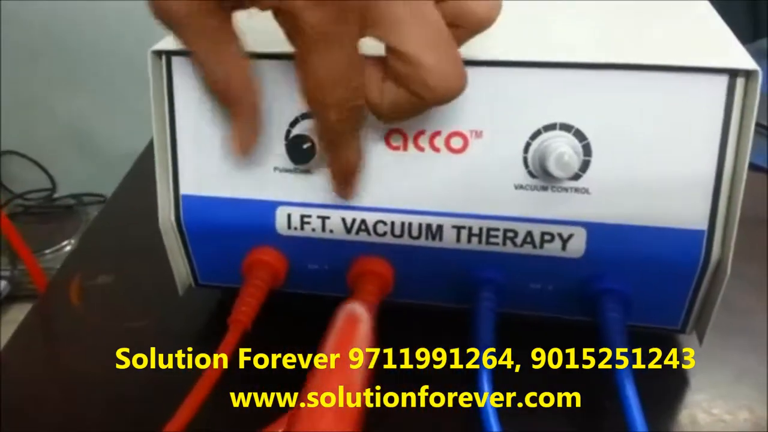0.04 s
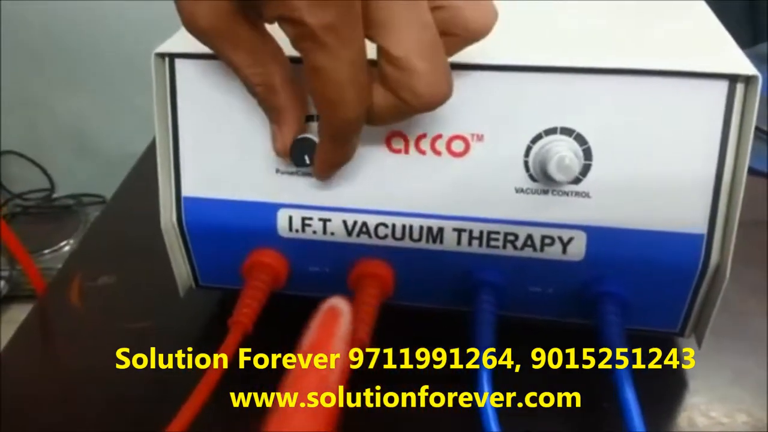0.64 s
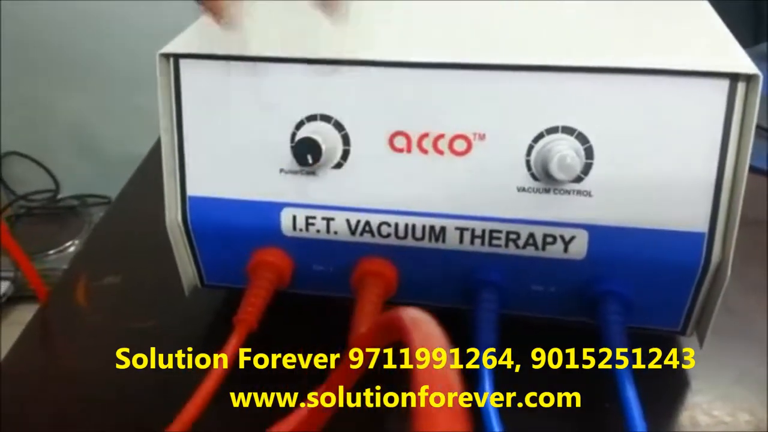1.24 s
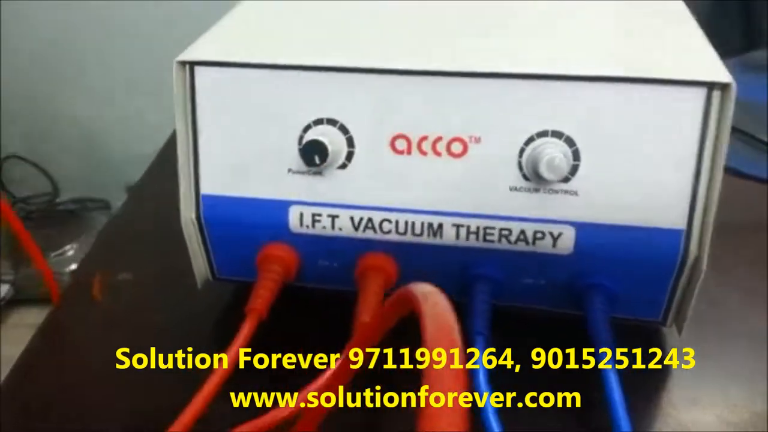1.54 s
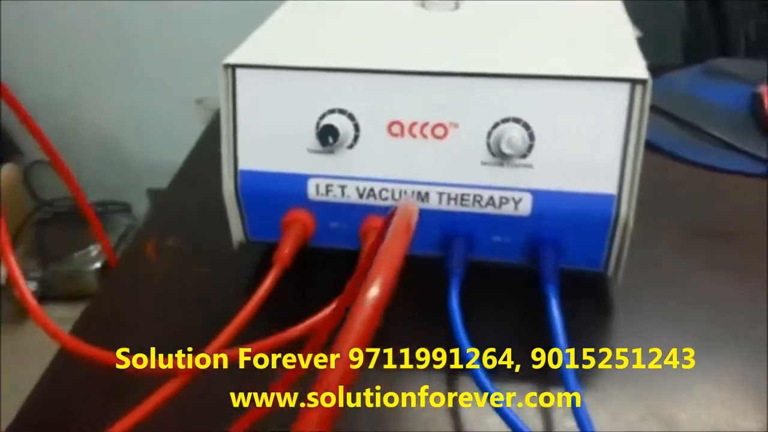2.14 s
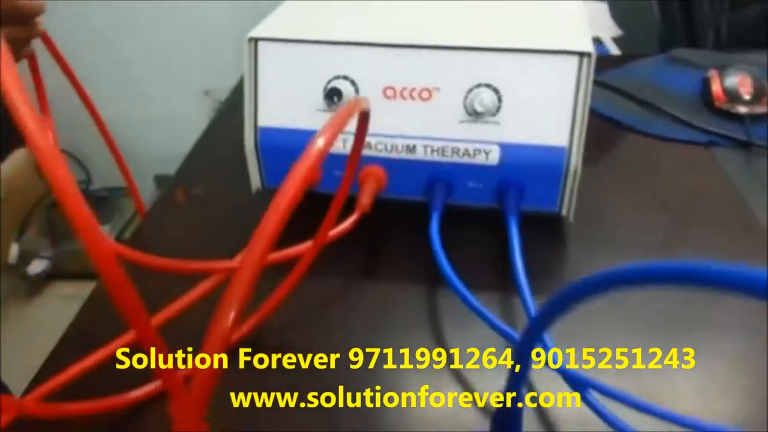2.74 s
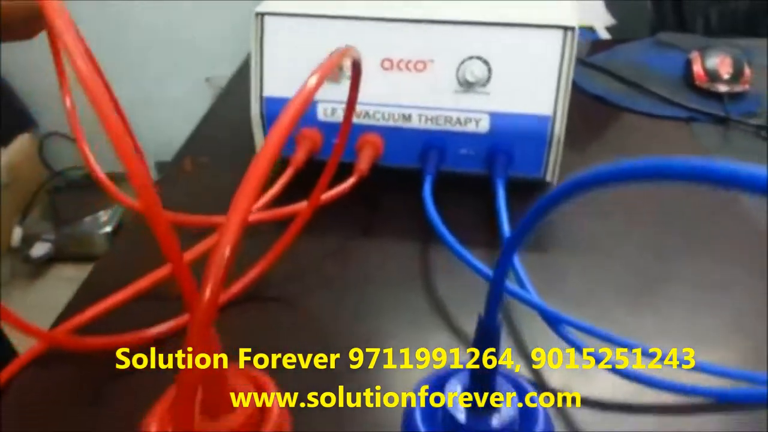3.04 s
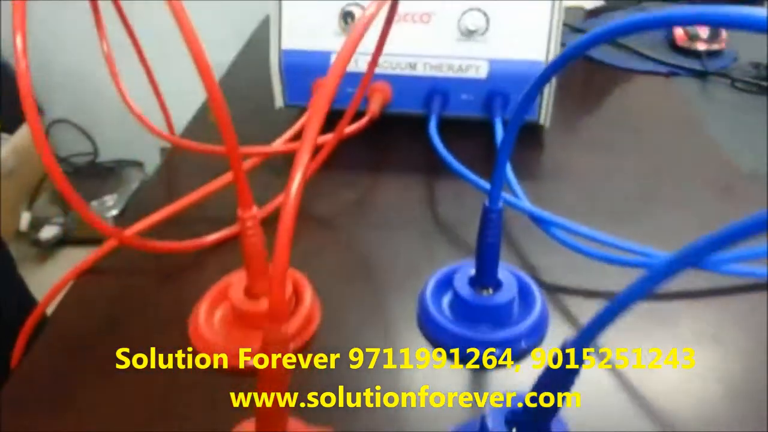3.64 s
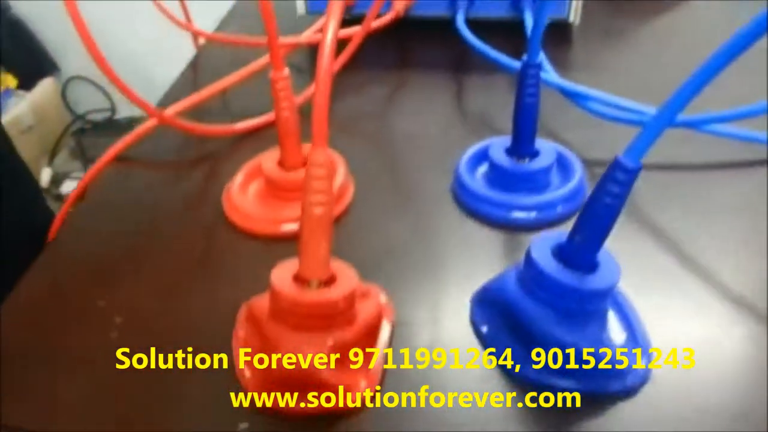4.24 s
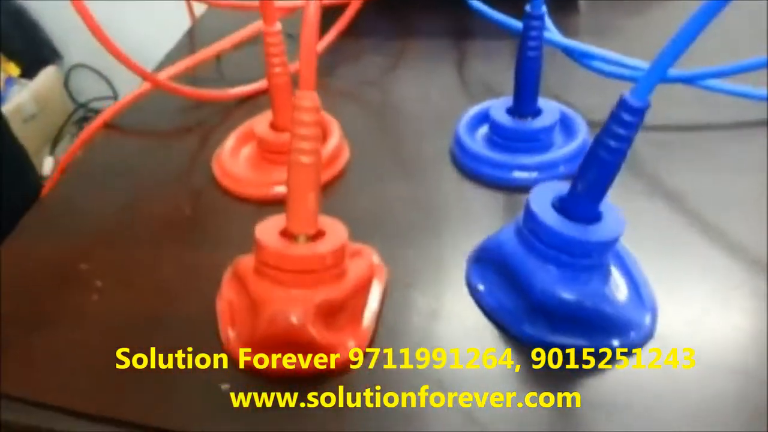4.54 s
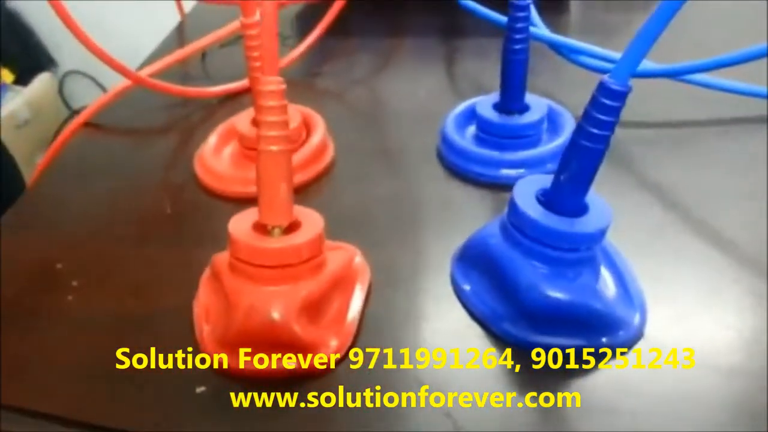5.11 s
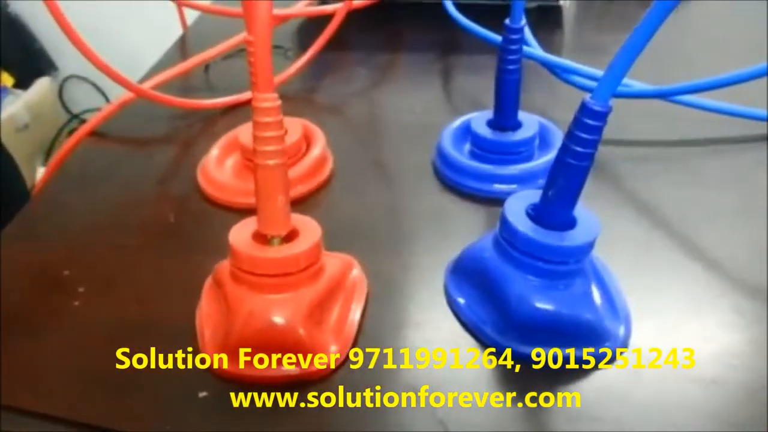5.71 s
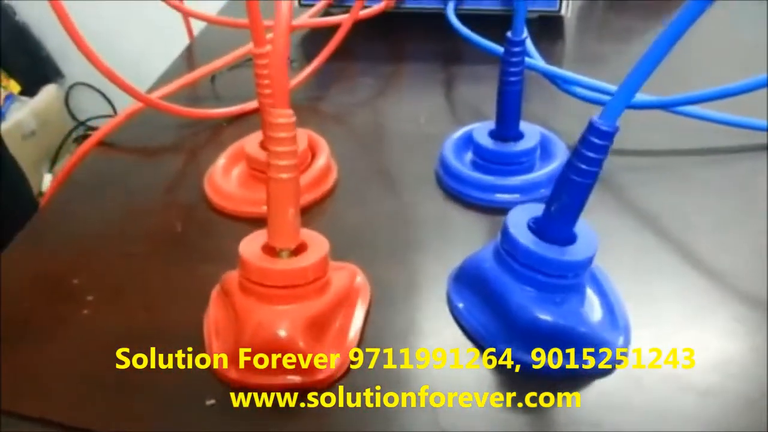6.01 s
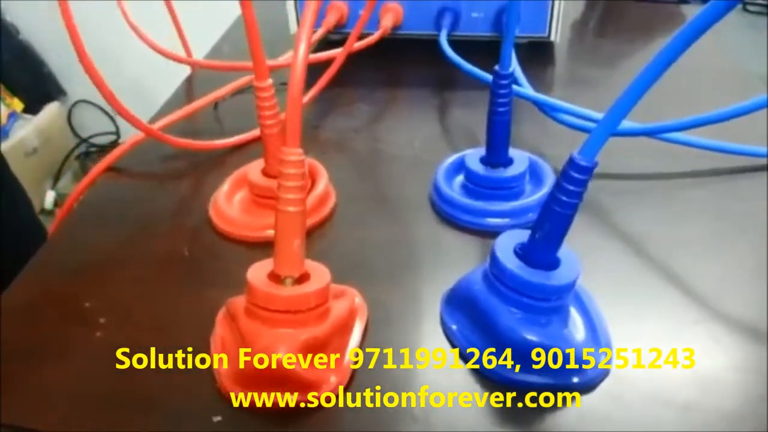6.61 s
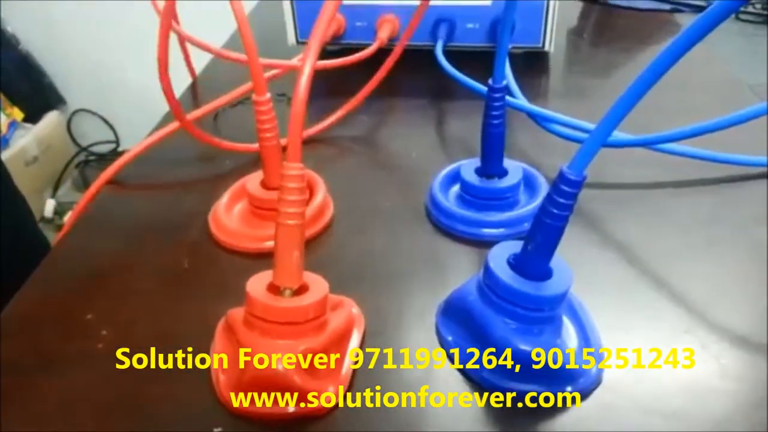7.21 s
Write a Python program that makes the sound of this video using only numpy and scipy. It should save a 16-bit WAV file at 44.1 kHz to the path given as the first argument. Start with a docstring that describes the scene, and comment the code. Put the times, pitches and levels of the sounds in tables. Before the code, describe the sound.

A small vacuum pump in a sheet-metal case runs three times on a table in a quiet room, heard in stereo. After light knob handling and a puff of air, each run begins with a clack and a rising whine, settling into a rattling, hissing hum. The first run squeals briefly. Twice the pump clacks off and winds down with faint seeping air. The microphone starts close and moves a little farther away.

```python
"""A small mains vacuum pump in a sheet-metal case, on a table in a quiet room, in stereo from close by.
A hand turns a knob, air parps at the valve, and relay and valve clack. The induction motor whines up to
speed, hums and rattles while air hisses, and squeals briefly. The microphone begins to draw back as the
pump clacks off and coasts, and the hoses leak. During a second run the microphone reaches its far spot;
from there we hear the pump stop again and start a third run, still going at the end."""
import sys
import numpy as np
from scipy import signal
from scipy.fft import rfft, irfft
from scipy.io import wavfile
from scipy.ndimage import uniform_filter1d

SR = 44100
rng = np.random.default_rng(int(sys.argv[2]) if len(sys.argv) > 2 else 0)


def generate_wav(sig):
    """Save sig (samples, or channels by samples) to the path in sys.argv[1] as 16-bit PCM at SR."""
    pcm = np.round(np.clip(np.atleast_2d(sig).T, -1, 1) * 32767).astype(np.int16)
    wavfile.write(sys.argv[1], SR, pcm)


N = 320198
T = np.arange(N) / SR
FREQ = np.maximum(np.arange(N // 2 + 1) * SR / N, 1)
SHAFT_HZ, MAINS_HZ, SPIN_UP_S, COAST_S = 45.17, 50, .335, .62

# The microphone's path. Each row: time in seconds, distance from 0 (near) to 1 (far).
MIC_DISTANCE = [(0, 0.0026), (1.9, 0), (2.6, 0.65), (3.4, 0.39), (3.9, 0.99), (7.26, 1)]
# Room tone. Each row: frequency in Hz, relative level in dB.
ROOM_TONE = [(15, -52.5), (25, -40), (40, -10), (146, -7), (231, -3.5), (415, -14.5), (1150, -19.5),
             (1540, -32), (2300, -27.5), (2700, -32), (3440, -36.5), (12400, -37.5), (15000, -45)]
# Handling rustle. Each row: middle in seconds, half length in seconds, level in dB.
RUSTLES = [(0.106, 0.089, -57.5), (0.368, 0.057, -49.5), (2.854, 0.067, -57), (5.472, 0.054, -61)]
# Knob and hose taps. Each row: start in seconds, level in dB, centre in Hz.
TAPS = [(0.045, -46.5, 900), (0.141, -44, 300), (0.150, -40.5, 1220), (2.479, -46, 250),
        (5.262, -50.5, 330), (6.824, -33, 2960)]
# Switching on. Each row: start in seconds, then snap, tail, ring, treble lift, gain of the run and
# panel tone, all in dB.
SWITCH_ON = [(0.4052, -16, -29.5, -29.5, 2, 0, -48), (3.0052, -20, -29.5, -33, -8.5, -1.25, -45),
             (5.6337, -28.5, -30.5, -35.5, -16, -1.5, -36.5)]
# Colour of the switch-on clack. Each row: frequency in Hz, relative level in dB.
ON_COLOUR = [(120, -22), (230, -12.5), (330, -4.5), (700, -7), (1020, -10.5), (1900, -9.5), (2500, -18),
             (3200, -8), (4050, -27.5), (5300, -6.5), (7700, -1.5), (8900, -1.5), (9500, -15.5),
             (10800, -9), (11700, -31.5), (13000, -23.5), (14500, -28)]
# The valve and its bracket. Each row: mode in Hz, relative level in dB, t60 in seconds.
VALVE_MODES = [(303, -2, 0.62), (328, -7, 0.34), (496, -6.5, 0.28), (644, -3, 0.32), (814, -3.5, 0.4),
               (963, 2, 0.095), (1300, -13.5, 0.23), (1716, -9.5, .14), (2102, -13, 0.29),
               (2950, -15.5, 0.26), (3340, -14, .2), (5300, -7.5, 0.21), (6600, -10.5, 0.099),
               (7960, -9, 0.099), (9500, -8.5, 0.11), (9080, 2.5, 0.084), (10850, -2.5, 0.086)]
# The pump jolts its mounts, starting and stopping. Each row: start in seconds, strength in dB.
JOLTS = [(0.407, -22), (0.443, -28), (0.547, -26), (0.567, -31), (0.608, -23.5), (0.657, -19.5),
         (0.727, -16), (0.786, -21), (0.831, -16.5), (3.378, -28.5), (3.54, -18), (2.385, -47),
         (2.452, -50), (2.53, -51), (4.944, -33), (5.09, -50), (5.172, -57)]
# The jolted case. Each row: mode in Hz, relative level in dB, t60 in seconds.
JOLT_MODES = [(103, -16, 0.14), (225, -14, .06), (349, 1.5, 0.087), (481, -5, 0.082), (811, -6.5, 0.043)]
# Case modes swept by the rotor slot whine. Each row: shaft multiple and mains multiple of the whine,
# mode in Hz, width in Hz, relative level in dB.
WHINE_MODES = [(17, 0, 490, 110, -35), (17, 0, 747, 190, -32), (17, 2, 850, 140, -38),
               (28, 0, 1050, 170, -37), (30, 0, 1250, 220, -39), (33, 0, 1450, 160, -47)]
# Case tones shaken by the starting current. Each row: centre in Hz, width in Hz, relative level in dB.
INRUSH_TONES = [(102, 15, -38.5), (289, 25, -44), (460, 64, -49), (790, 110, -42)]
# Harmonics of the pump stroke. Each row: shaft multiple, relative level near and far in dB.
STROKE_HARMONICS = [(1, -53, -53.5), (2, -39.5, -42), (3, -37, -39), (4, -40, -39), (5, -28.5, -37),
                    (6, -33, -37), (7, -37.5, -35.5), (8, -24, -42), (9, -30.5, -40.5), (10, -33.5, -39),
                    (11, -32.5, -37), (12, -44, -55), (13, -58, -52), (14, -39, -45.5), (15, -52, -45),
                    (16, -58, -42), (17, -40.5, -33.5), (18, -56, -54), (19, -46, -64.5), (21, -51, -57),
                    (22, -54, -62), (23, -53, -59.5), (25, -48, -53.5), (26, -57.5, -67),
                    (27, -55.5, -49.5), (28, -74.5, -54), (29, -60.5, -52.5), (30, -62, -49),
                    (32, -48.5, -52), (33, -51.5, -62)]
# Magnetic hum and its beats. Each row: shaft multiple, mains multiple, relative level near and far in dB.
MAGNETIC_HUM = [(0, 2, -39, -46), (0, 6, -55, -45.5), (2, 2, -49.5, -49), (3, 2, -49.5, -49),
                (5, 2, -44.5, -44), (6, 2, -37.5, -47.5), (7, 2, -41.5, -55), (8, 2, -39.5, -47.5),
                (9, 2, -47.5, -55), (9, -2, -42.5, -55), (11, -2, -44.5, -55), (12, -2, -47.5, -56),
                (12, 2, -51.5, -56), (16, 2, -50.5, -42), (17, -2, -51.5, -49.5), (17, 2, -38, -46.5),
                (17, 4, -47.5, -53), (17, 12, -58, -52.5)]
# Unsteady bearing tones. Each row: shaft multiple, relative level near and far in dB.
BEARING_TONES = [(2.46, -40, -49), (2.55, -43.5, -48), (3.45, -37.5, -40), (3.55, -32.5, -38),
                 (5.55, -54, -46), (5.66, -56, -44.5), (10.5, -39, -49), (10.75, -48, -45),
                 (18.77, -50, -48)]
# Case rattle. Each row: frequency in Hz, relative density near and far in dB.
CASE_RATTLE = [(25, -90.5, -86), (55, -78, -71), (90.5, -64, -73), (230, -64.5, -62.5), (355, -56.5, -65),
               (570, -70.5, -68), (850, -66, -67), (1310, -66, -65), (1880, -73.5, -78),
               (3060, -90.5, -89.5), (6000, -110, -112)]
# Case resonances that colour the rattle. Each row: centre in Hz, width in Hz, lift in dB.
CASE_RESONANCES = [(105.6, 64, 6.5), (157, 150, 10), (490, 87, 11), (788, 150, 10)]
# Air through the pump valves. Each row: frequency in Hz, relative density near and far in dB.
VALVE_HISS = [(900, -100, -100), (2050, -79, -83.5), (2700, -79.5, -83.5), (3140, -76, -75),
              (3630, -78.5, -79.5), (4100, -83, -86), (5640, -78.5, -81.5), (8300, -79.5, -84.5),
              (8700, -78, -79.5), (10230, -81.5, -86), (10400, -73.5, -79), (11930, -89, -95.5),
              (13800, -84, -89.5), (14400, -91, -98.5)]
# Growls of the case. Each row: middle in seconds, half length in seconds, pitch in Hz, level in dB.
GROWLS = [(.755, 0.018, 765, -28), (3.317, 0.029, 765, -29), (3.385, .025, 765, -36),
          (5.96, .014, 750, -27), (5.979, .011, 765, -21.5), (6.04, .014, 790, -27.5),
          (5.893, 0.036, 255, -43), (6.023, 0.065, 255, -27)]
# Spurts of the squeal. Each row: start and length in seconds, fundamental and octave in dB.
SQUEAL_SPURTS = [(1.55, .03, -38, -52), (1.578, .042, -35.5, -42.5), (1.63, .052, -34, -46.5),
                 (1.686, .055, -42, -42), (1.743, .062, -52, -41)]
# Switching off. Each row: start in seconds, then snap, tail, ring and treble lift in dB,
# seconds until the load vents, groan in dB.
SWITCH_OFF = [(2.1386, -12.5, -27, -30, -1.5, 0.016, -32), (4.767, -23.5, -28.5, -36.5, -11, 0.051, -31)]
# Colour of the switch-off clack. Each row: frequency in Hz, relative level in dB.
OFF_COLOUR = [(200, -18.5), (500, -2), (1000, -7), (1400, 1), (1900, 6.5), (2600, 4.5), (3300, -1),
              (4300, -4), (5400, 3.5), (7400, 9.5), (9000, -4), (12000, -7.5), (14500, -4)]
# The stop that the released armature falls against. Each row: mode in Hz, level in dB, t60 in seconds.
BACK_STOP_MODES = [(1250, -20, .03), (1390, -18.5, .035), (1685, -27, .06), (1841, -27, .06),
                   (2094, -28, .05), (2380, -27, .03)]
# Resonances that groan on slowing. Each row: centre in Hz, width in Hz, relative level in dB.
GROAN_MODES = [(105, 74, -7), (250, 120, -3.5), (496, 69, -14.5), (760, 62, -5)]
# Hum notes that ring on in case and room. Each row: pitch in Hz, relative level near and far in dB.
LINGERING_NOTES = [(102, -30, -45.5), (161.5, -34, -35.5), (361, -27.5, -43), (482, -28, -40.5),
                   (765, -46, -35)]
# Stereo width at the microphone. Each row: frequency in Hz, side gain in dB.
STEREO_WIDTH = [(60, -7), (110, -32), (200, -13.5), (380, -17.5), (700, -8), (1290, -4.5), (2380, -0.5),
                (4400, 0), (15000, 0)]
# Stereo balance. Each row: frequency in Hz, left minus right in dB.
STEREO_LEAN = [(60, 0.5), (200, 1), (400, 0.5), (750, 1.5), (1290, -4.5), (2380, 7), (4400, 0.5),
               (8000, -1), (15000, 1)]


def undb(db):
    """Decibels to gain."""
    return 10 ** (np.asarray(db) / 20)


def spectrum(rows, column=1):
    """One column of a table, joined by straight lines in log frequency."""
    rows = np.array(rows, float)
    return np.interp(np.log(FREQ), np.log(rows[:, 0]), rows[:, column])


def noise(db):
    """Unrelated mid and side noise with this level per Hz."""
    return irfft(rfft(rng.standard_normal((2, N))) * undb(db), N) * np.sqrt(SR / 2)


def unit(x):
    """Scale to rms 1."""
    return x / np.sqrt(np.mean(x ** 2))


def band(hz, width_hz):
    """Noise in one resonance, rms 1."""
    detune = (FREQ - hz ** 2 / FREQ) / width_hz
    return unit(noise(-20 * np.log10(1 + detune ** 2)))


def resonance(hz, centre_hz, width_hz):
    """A resonance curve, 1 at its centre."""
    return 1 / (1 + (2 * (hz - centre_hz) / width_hz) ** 2)


def walk(rate_hz):
    """A random wander in time, spread near 1."""
    knots = np.arange(0, T[-1] + 1, 1 / rate_hz)
    return np.interp(T, knots, rng.standard_normal(len(knots)))


def ripple(spacing_hz):
    """Peaks and dips that reflections leave in a spectrum, spread near 1."""
    knots = np.arange(0, SR, spacing_hz)
    return np.interp(FREQ, knots, rng.standard_normal(len(knots)))


def tone(turns, spread=3.1):
    """A sine of rms 1 that reaches mid and side in unrelated phases."""
    phase = np.array([[spread * rng.standard_normal()], [2 * np.pi * rng.random()]])
    return np.sqrt(2) * np.cos((2 * np.pi * (turns % 1) + phase).astype(np.float32))


def swell(time, peak_s, half_s):
    """A bell-shaped rise and fall."""
    return np.exp(-((time - peak_s) / half_s) ** 2)


def envelope(start_s, attack_s, hold_s, release_s):
    """Attack, hold and release with rounded corners."""
    corners = start_s + np.cumsum([0, attack_s, hold_s, release_s])
    return np.sin(np.pi / 2 * np.interp(T, corners, [0, 1, 1, 0])) ** 2


def latest(rows):
    """For every moment, the columns of the most recent event of a table."""
    rows = np.array(rows, float)
    return rows[np.maximum(np.searchsorted(rows[:, 0], T) - 1, 0)].T


def room(floor_db=-59, flicker_db=1.6):
    """Low room tone that swells with handling."""
    rustle = sum(undb(db) * swell(T, s, half_s) for s, half_s, db in RUSTLES)
    return unit(noise(spectrum(ROOM_TONE))) * np.hypot(undb(floor_db), rustle) * undb(flicker_db * walk(9.7))


def taps(t60=.023, tail_db=-20, tail_t60=.3):
    """Small knocks on knob and hose, each with a short room tail."""
    out = np.zeros((2, N))
    for s, db, hz in TAPS:
        age = np.clip(T - s, 0, 1)
        decay = undb(-60 * age / t60) + undb(tail_db - 60 * age / tail_t60)
        out += undb(db) * np.minimum(age / .0022, 1) * decay * band(hz, .84 * hz)
    return out


def parp(start_s=.281, hz=438, sag_hz_per_s=200, tone_db=-41, hiss_db=-53):
    """Air parps and hisses at the valve just before the first run, reedy and sagging in pitch."""
    pitch = hz - sag_hz_per_s * np.clip(T - start_s, 0, 1)
    turns = np.cumsum(pitch * (1 + .003 * walk(60))) / SR
    flutter = undb(2.5 * walk(40.8))
    reed = tone(turns) + undb(-27) * tone(2 * turns) + undb(-22) * tone(3 * turns)
    hiss = undb(hiss_db) * envelope(start_s, .068, .086, .06) * band(1300, 1500)
    return undb(tone_db) * envelope(start_s, .044, .029, .041) * flutter * reed + hiss


def clacks(rows, colour, chatter_s, snap_t60, tail_t60, size=30000):
    """The armature chatters briefly and rings the valve; case and room carry the tail."""
    out, t = np.zeros((2, N)), np.arange(size) / SR
    attack = 1 - np.exp(-t / .0012)
    for s, snap_db, tail_db, ring_db, treble_db, *_ in rows:
        start = int(s * SR)
        colour_db = spectrum(colour) + 3.2 * ripple(90) + treble_db * FREQ / (FREQ + 3000)
        grain = unit(noise(colour_db))[:, :size]
        snap = undb(snap_db - 60 * np.maximum(t - chatter_s, 0) / snap_t60)
        tail = undb(tail_db - 60 * t / tail_t60)
        ring = sum(undb(db - 60 * t / t60) * np.sin(2 * np.pi * (hz * t + rng.random((2, 1))))
                   for hz, db, t60 in VALVE_MODES)
        out[:, start:start + size] += attack * (grain * np.hypot(snap, tail) + undb(ring_db) * ring)
    return out


def strikes(blows, modes, size=12000):
    """Each blow (seconds, dB) rings the same modes; the deepest bass below about 70 Hz is cut away."""
    out, t = np.zeros((2, N)), np.arange(size) / SR
    attack = 1 - np.exp(-t / .0006)
    for s, blow_db in blows:
        start = int(s * SR)
        for hz, db, t60 in modes:
            phase = np.array([[0], [rng.random()]])
            ring = undb(db - 60 * t / t60) * np.sin(2 * np.pi * (hz * t + phase))
            out[:, start:start + size] += undb(blow_db) * attack * ring
    return signal.sosfilt(signal.butter(2, 70, "high", fs=SR, output="sos"), out)


def motor(age, coasting, brake_power=1.5):
    """Share of full speed, and mains on or off: steady torque spins the rotor up, the load brakes it."""
    speed = np.clip(age / SPIN_UP_S, 0, 1) * (1 - np.clip(coasting / COAST_S, 0, 1) ** brake_power)
    powered = 1. * ((age > 0) & (coasting == 0))
    return uniform_filter1d(speed, size=1500).clip(0, 1), uniform_filter1d(powered, size=1500)


def spin_up(turns, speed, powered, age, whine_db=-3.5, buzz_db=-38, settle_s=.053, fade_db_per_s=154):
    """The rising slot whine flares in each mode it crosses while heavy current shakes the case."""
    ragged = .08 * walk(120)
    whine = 0
    for k, m, hz, width, db in WHINE_MODES:
        pitch = k * SHAFT_HZ * speed + m * MAINS_HZ
        whine += undb(db) * resonance(pitch, hz, width) * tone(k * turns + m * MAINS_HZ * T + ragged)
    whine *= undb(whine_db - fade_db_per_s * np.maximum(age - SPIN_UP_S - settle_s, 0))
    # the panels buzz at each peak of the mains current
    peaks = np.cos(2 * np.pi * MAINS_HZ * T) ** 4
    buzz = undb(buzz_db) * swell(age, SPIN_UP_S, .058) * peaks * (band(300, 270) + band(670, 320))
    # the piston load chops the whine once a turn
    chop = 1 + .3 * np.cos(2 * np.pi * turns) + .15 * walk(150)
    shake = sum(undb(db) * band(hz, width) for hz, width, db in INRUSH_TONES)
    current = np.minimum(2 * speed, 1) ** 2 * (1 - speed ** 3)
    return powered * (chop * whine + buzz + current * shake)


def panel(age, panel_db, hz=328):
    """A panel of the case sings briefly while the rotor is still slow."""
    return undb(panel_db) * swell(age, peak_s=.16, half_s=.077) * tone(hz * T + .05 * walk(30))


def gush(age, far, db=-50, far_db=-5):
    """Air rushes through the opened valve until the pump takes over."""
    return undb(db + far_db * far) * swell(age, peak_s=.2, half_s=.12) * band(5500, 9000)


def hum(turns, speed, powered, far, return_turns=.365, return_share=.9, waver_db=.6, bearing_db=1):
    """Harmonics of the piston's two knocks a turn, with mains beats and bearing tones between them."""
    orders, near_levels, far_levels = np.transpose(STROKE_HARMONICS)
    out = np.zeros((2, N))
    # the room scatters every harmonic's phase alike: about 0.1 radian close up, 0.4 from afar
    scatter = .1129 + .2936 * far
    for k, near, away in STROKE_HARMONICS:
        # off full speed, each harmonic slides through the response of the case
        passing_db = np.interp(k * speed, orders, near_levels + far_levels) / 2 - (near + away) / 2
        pair_phase = np.angle(1 + return_share * np.exp(-2j * np.pi * k * return_turns)) + np.pi / 2
        offset = (pair_phase + scatter * rng.standard_normal()) / (2 * np.pi)
        level_db = near + far * (away - near) + .6 * passing_db + waver_db * walk(9)
        out += undb(level_db) * tone(k * turns + offset, spread=0)
    for k, m, near, away in MAGNETIC_HUM:
        out += powered * undb(near + far * (away - near)) * tone(k * turns + m * MAINS_HZ * T)
    for k, near, away in BEARING_TONES:
        slip = .09 * walk(5.5)
        out += undb(near + far * (away - near) + bearing_db) * tone(k * turns + slip)
    return out


def distant_noise(rows, lift_db, far):
    """Noise that fades from its near colour to its far one as the microphone draws back."""
    near, away = (noise(spectrum(rows, column) + lift_db) for column in (1, 2))
    return (1 - far) * near + np.sqrt(1 - (1 - far) ** 2) * away


def case_rattle(far, gain_db=-2, flicker_db=1.5):
    """The sheet metal rattles unevenly, lifted at its resonances."""
    lift_db = sum(db * resonance(FREQ, hz, width) for hz, width, db in CASE_RESONANCES)
    rattle = distant_noise(CASE_RATTLE, lift_db + 2.7 * ripple(14), far)
    return rattle * undb(gain_db + flicker_db * walk(45))


def valve_hiss(turns, far, depth_db=1.5, flicker_db=1):
    """Air through the valves swells once a turn, each stroke a little different."""
    air = distant_noise(VALVE_HISS, 2.2 * ripple(70), far)
    return air * undb(depth_db * np.cos(2 * np.pi * turns) + flicker_db * walk(45))


def knocks(turns, speed, hz, width_hz, decay_s, scatter_db):
    """Once a turn a knock sets one resonance ringing, each with its own strength."""
    age = (turns % 1) / (SHAFT_HZ * np.maximum(speed, .01))
    strength = undb(scatter_db * rng.standard_normal(int(turns[-1]) + 1))[turns.astype(int)]
    return band(hz, width_hz) * strength * np.exp(-age / decay_s) * (1 - np.exp(-age / .0016))


def growls():
    """Modes of the case flare in short rough bursts as the rotor reaches speed."""
    wander, rough = .14 * walk(120), undb(2 * walk(150))
    return rough * sum(undb(db) * np.exp(-np.abs(T - s) / half_s) * tone(hz * T + wander, spread=0)
                       for s, half_s, hz, db in GROWLS)


def judder(age, far, db=-31.5, far_db=-10):
    """The pump judders on its mounts just after it reaches speed."""
    return undb(db + far_db * far) * swell(age, peak_s=SPIN_UP_S + .11, half_s=.14) * band(82, 36)


def squeal(hz=1072, edge_s=.014, flutter_db=1.8):
    """The running pump squeals in a few spurts that break up into the octave."""
    turns = np.cumsum(hz * (1 + .003 * walk(60))) / SR
    low, high = tone(turns, spread=0), tone(2 * turns, spread=0)
    spurts = 0
    for s, length, low_db, high_db in SQUEAL_SPURTS:
        gate = envelope(s - edge_s / 2, edge_s, length - edge_s, edge_s)
        spurts += gate * (undb(low_db) * low + undb(high_db) * high)
    return undb(flutter_db * walk(40.7)) * spurts


def run_down(turns, speed, coasting, far, chug_db=-28, clatter_db=-44.5, fade_db_per_s=34, far_db=-7.5):
    """The last slow strokes rock the pump on its mounts and clatter in the case."""
    chug = undb(chug_db) * knocks(turns, speed, hz=115, width_hz=130, decay_s=.062, scatter_db=2)
    clatter = undb(clatter_db) * knocks(turns, speed, hz=950, width_hz=910, decay_s=.014, scatter_db=5)
    return (chug + clatter) * np.minimum(2 * speed, 1) * undb(far_db * far - fade_db_per_s * coasting)


def groan(turns, speed, coasting, groan_db, rise_s=.057, fade_db_per_s=80):
    """Ragged harmonics of the slowing stroke fall through the resonances of the case."""
    response = sum(undb(db) * resonance(FREQ, hz, width) for hz, width, db in GROAN_MODES)
    uneven = turns + .018 * walk(70)
    falling = sum(np.interp(k * SHAFT_HZ * speed, FREQ, response) * tone(k * uneven)
                  for k in range(2, 20))
    return falling * speed * np.minimum(coasting / rise_s, 1) * undb(groan_db - fade_db_per_s * coasting)


def reverb(x, t60=.33, wet_db=-4.5, size=22000):
    """The small room smears a sound with a short diffuse tail; the level stays the same."""
    tail = rng.standard_normal((2, size)) * undb(-60 * np.arange(size) / SR / t60)
    wet = signal.fftconvolve(x, tail / np.sqrt(np.sum(tail[0] ** 2)), axes=1)[:, :N]
    return (x + undb(wet_db) * wet) / np.hypot(1, undb(wet_db))


def after_ring(coasting, far, rise_s=.047, fade_db_per_s=98):
    """The strongest notes of the hum hang on at their pitch while the rotor slows."""
    notes = sum(undb(near + far * (away - near)) * tone(hz * T + .1 * walk(25))
                for hz, near, away in LINGERING_NOTES)
    return notes * np.minimum(coasting / rise_s, 1) * undb(-fade_db_per_s * coasting)


def leaks(coasting, far, seep_db=-57.5, whistle_db=-56.5, far_db=-14.5, rise_s=.22, fade_db_per_s=9):
    """The hoses seep and faintly whistle after switch-off, ever less as the vacuum is lost."""
    gain = np.minimum(coasting / rise_s, 1) * undb(far_db * far - fade_db_per_s * coasting)
    whistle = band(2600, 110) + undb(-3) * band(2940, 160)
    whistle *= undb(whistle_db - 14 * far ** 2 + 5 * walk(22))  # flutters, and carries less far
    return gain * (undb(seep_db) * band(2200, 6500) + whistle)


def pump(age, coasting, far, unload_db_per_s=25, vent_db_per_s=94, air_fade_db_per_s=164):
    """The shaft leads the pump through starting, running and stopping."""
    *_, run_db, panel_db = latest(SWITCH_ON)
    *_, vent_s, groan_db = latest(SWITCH_OFF)
    speed, powered = motor(age, coasting)
    turns = np.cumsum(SHAFT_HZ * speed * (1 + .0009 * walk(12))) / SR
    rattle, hiss = case_rattle(far), valve_hiss(turns, far)
    piston = knocks(turns, speed, hz=405, width_hz=280, decay_s=.0048, scatter_db=-.5)
    piston *= undb(-25 - 6 * far)
    tick = knocks(turns, speed, hz=3620, width_hz=170, decay_s=.012, scatter_db=3.5)
    tick *= undb(-45.5) * (1 - far)
    # the hum grows with the vacuum, the rattle with the speed, the hiss with the flow
    vacuum = np.minimum(age / .48, 1) ** 2.18 * undb(-unload_db_per_s * coasting)
    flow = np.minimum(age / .4, 1) ** 2.87 * undb(-.08 - air_fade_db_per_s * coasting)
    body = vacuum * hum(turns, speed, powered, far) + speed ** 1.47 * (rattle + piston)
    # after switch-off the noise holds for a moment, then dies as the load vents
    body *= undb(-vent_db_per_s * np.maximum(coasting - vent_s, 0))
    running = undb(run_db) * (body + flow * (hiss + tick))
    starting = spin_up(turns, speed, powered, age) + growls()
    starting += judder(age, far) + gush(age, far) + panel(age, panel_db)
    last_strokes = (1 - powered) * run_down(turns, speed, coasting, far)
    stopping = reverb(last_strokes + groan(turns, speed, coasting, groan_db)) + after_ring(coasting, far)
    return starting + running + stopping


def scene():
    """All sources as mid and side, turned to left and right: bass centred, treble diffuse."""
    far = np.interp(T, *np.transpose(MIC_DISTANCE))
    on, off = latest(SWITCH_ON)[0], latest(SWITCH_OFF)[0]
    age = np.maximum(T - on, 0)  # seconds since switch-on
    coasting = np.maximum(T - off, 0) * (off > on)  # seconds since switch-off, 0 under power
    switching = clacks(SWITCH_ON, ON_COLOUR, chatter_s=.0053, snap_t60=.022, tail_t60=.34)
    switching += clacks(SWITCH_OFF, OFF_COLOUR, chatter_s=.0009, snap_t60=.023, tail_t60=.35)
    switching += strikes([(s, 0) for s, *_ in SWITCH_OFF], BACK_STOP_MODES)
    machine = pump(age, coasting, far) + strikes(JOLTS, JOLT_MODES) + switching + parp() + squeal()
    mid, side = rfft(machine + taps() + leaks(coasting, far) + room())
    side *= undb(spectrum(STEREO_WIDTH))
    lean = undb(spectrum(STEREO_LEAN) / 2)
    fade_in = np.minimum(T / .02, 1) ** 2
    return fade_in * irfft(np.array([(mid + side) * lean, (mid - side) / lean]), N)


def record(dry, top_hz=14650):
    """The recorder cuts the top steeply."""
    return signal.sosfilt(signal.ellip(10, .2, 80, top_hz, fs=SR, output="sos"), dry)


dry = scene()
out = record(dry)
generate_wav(out)
```